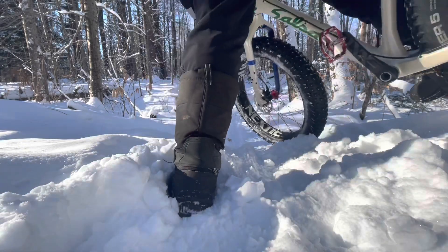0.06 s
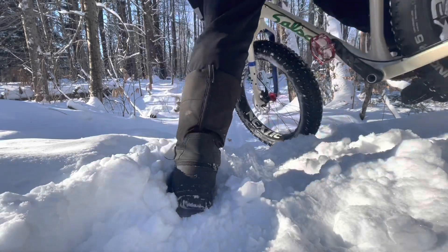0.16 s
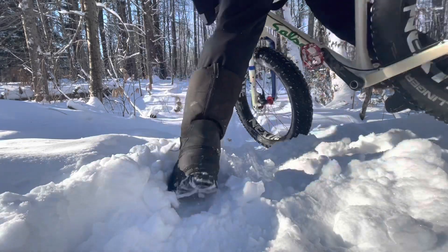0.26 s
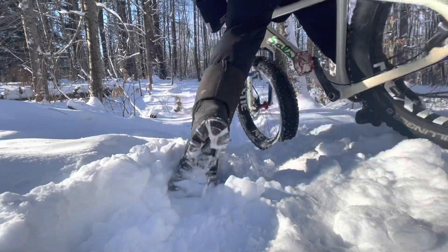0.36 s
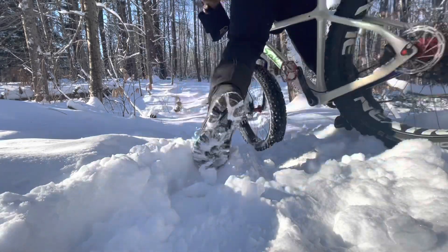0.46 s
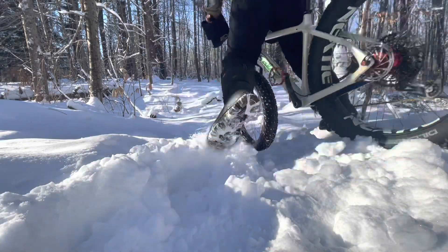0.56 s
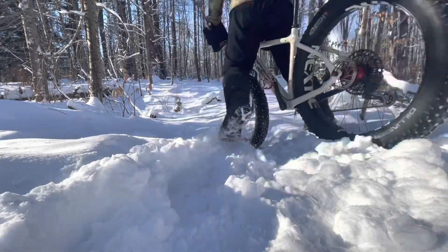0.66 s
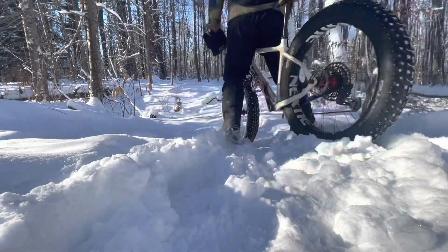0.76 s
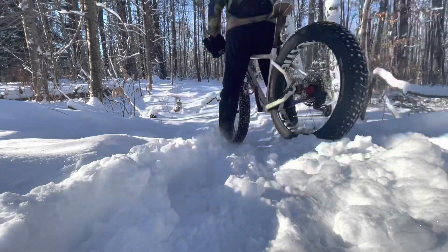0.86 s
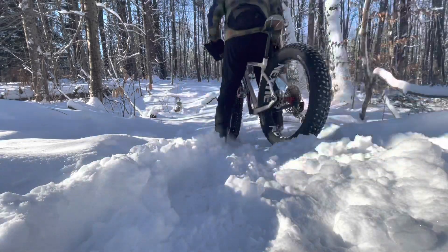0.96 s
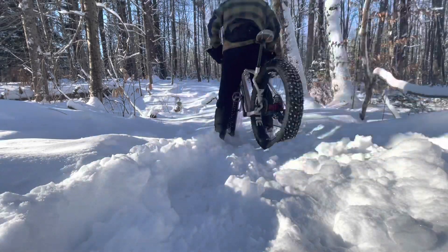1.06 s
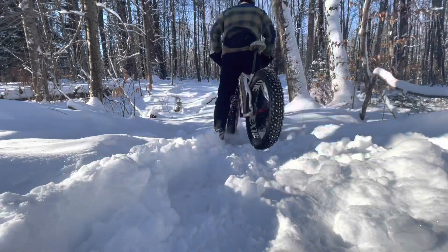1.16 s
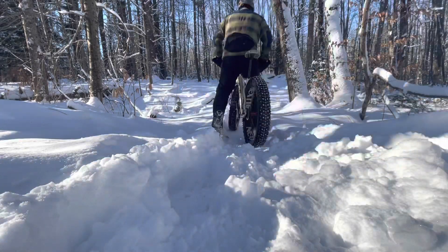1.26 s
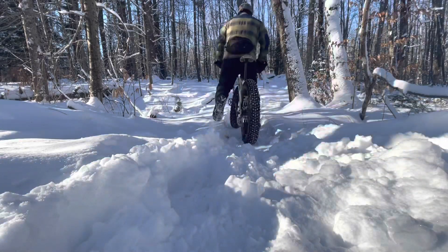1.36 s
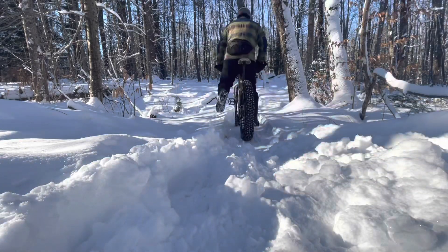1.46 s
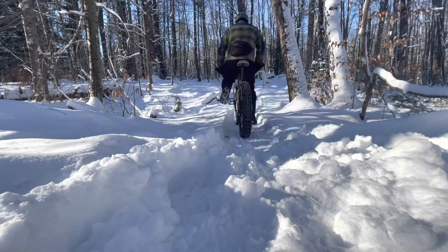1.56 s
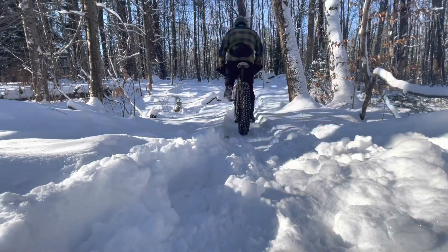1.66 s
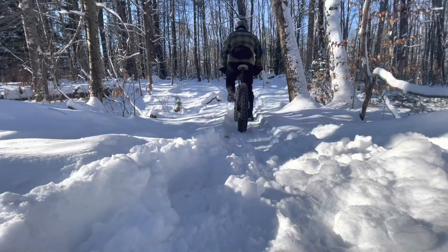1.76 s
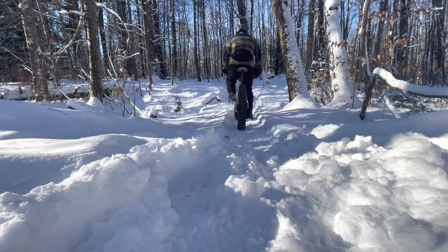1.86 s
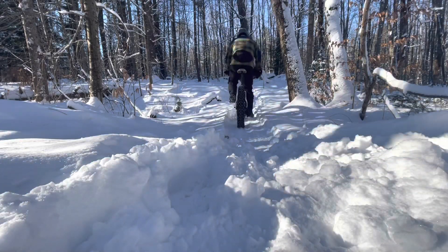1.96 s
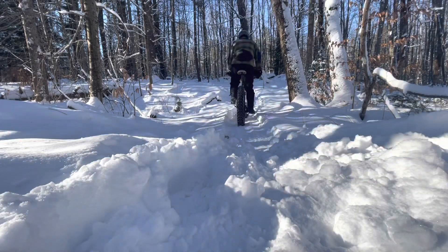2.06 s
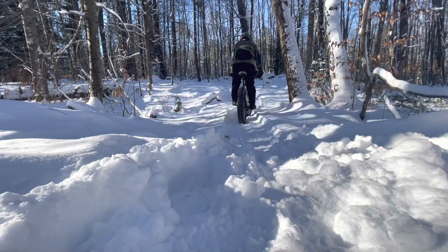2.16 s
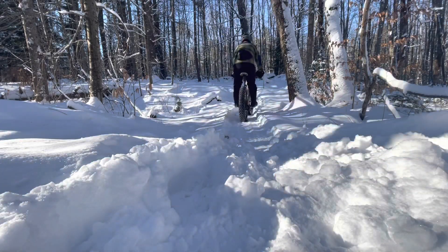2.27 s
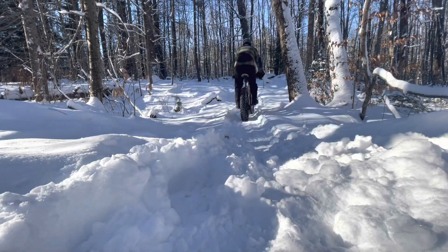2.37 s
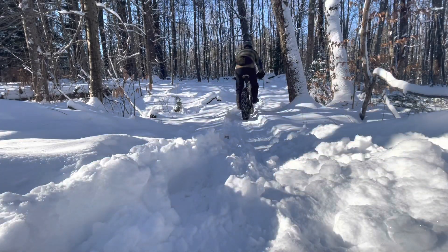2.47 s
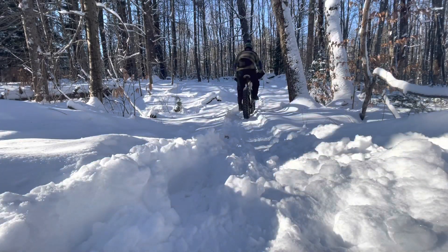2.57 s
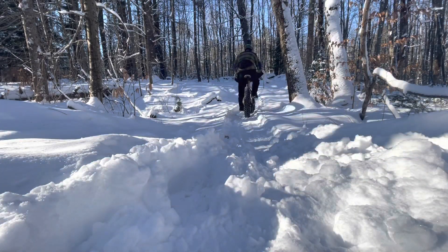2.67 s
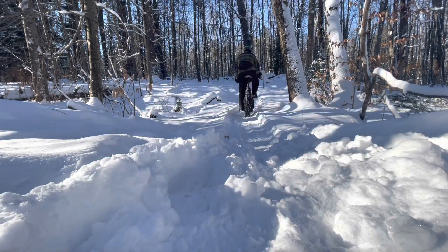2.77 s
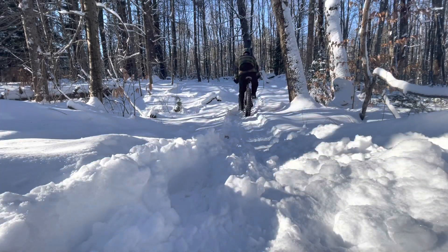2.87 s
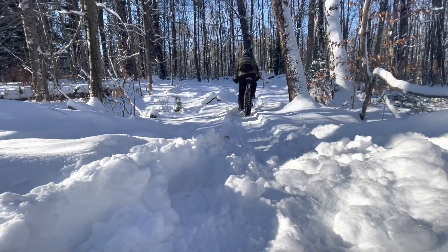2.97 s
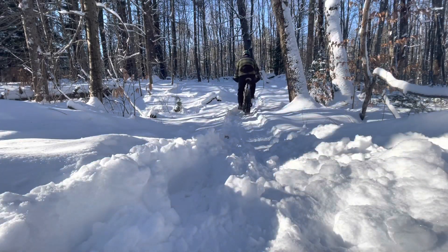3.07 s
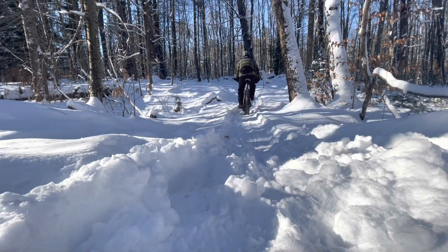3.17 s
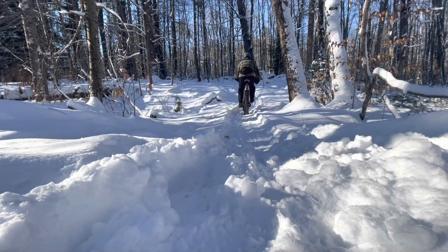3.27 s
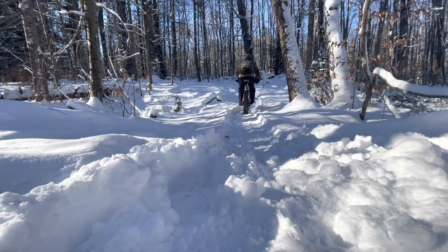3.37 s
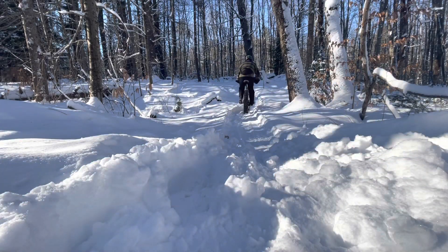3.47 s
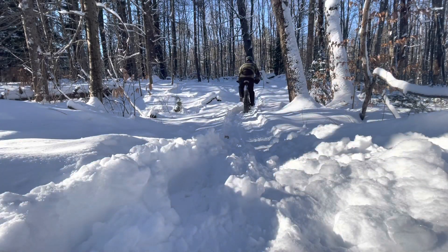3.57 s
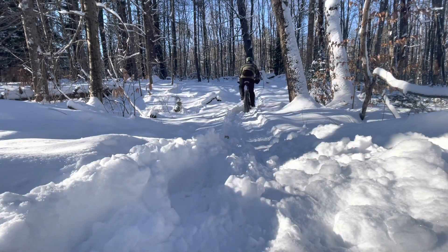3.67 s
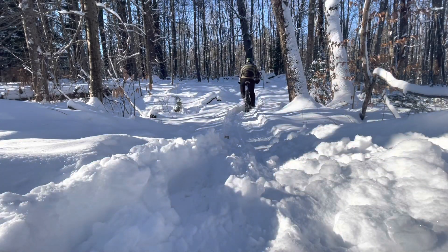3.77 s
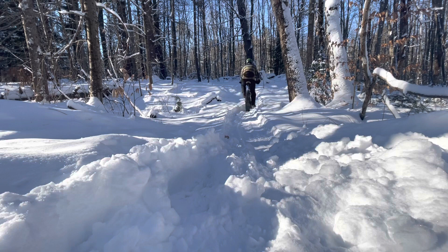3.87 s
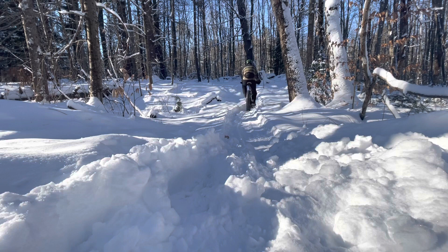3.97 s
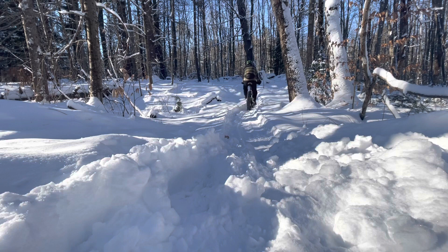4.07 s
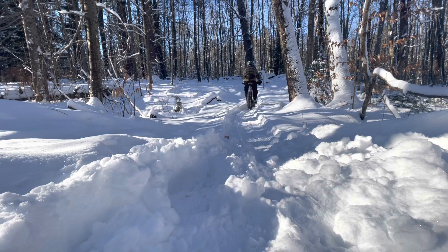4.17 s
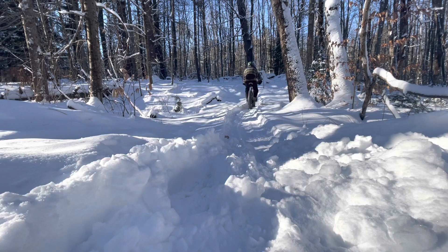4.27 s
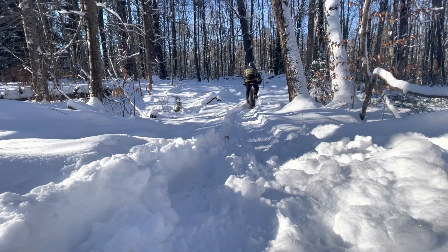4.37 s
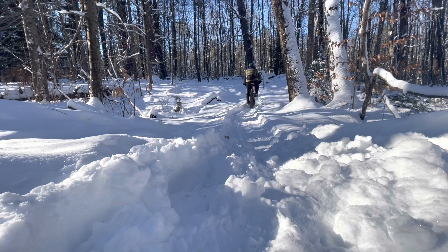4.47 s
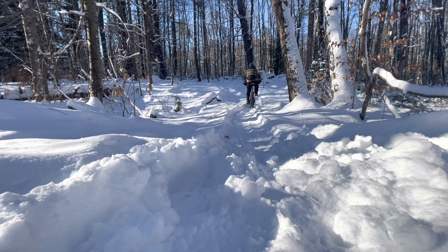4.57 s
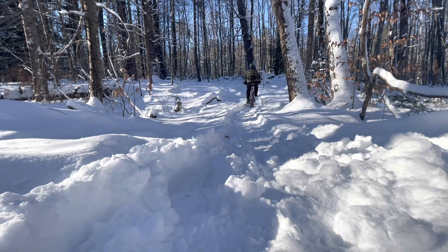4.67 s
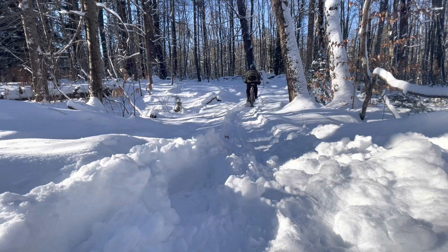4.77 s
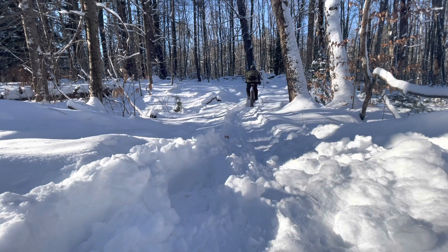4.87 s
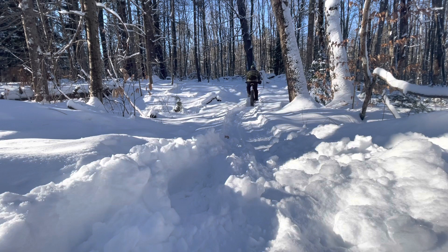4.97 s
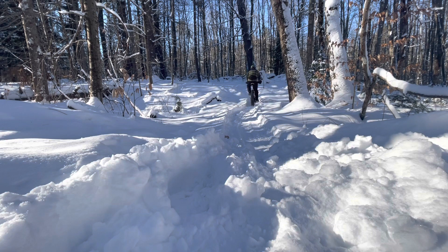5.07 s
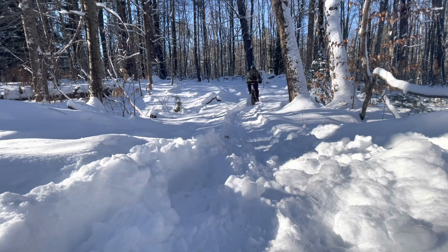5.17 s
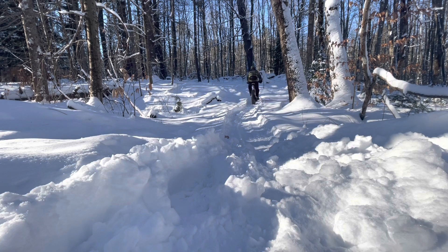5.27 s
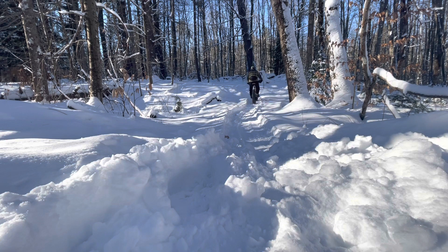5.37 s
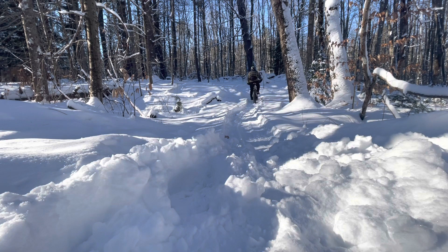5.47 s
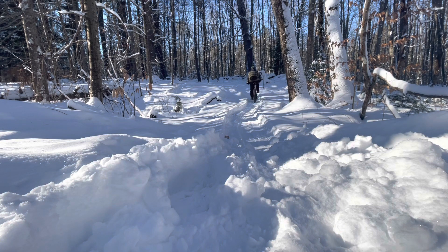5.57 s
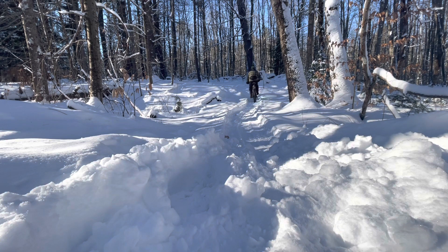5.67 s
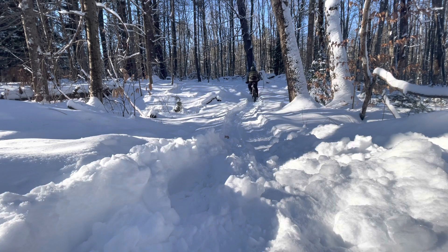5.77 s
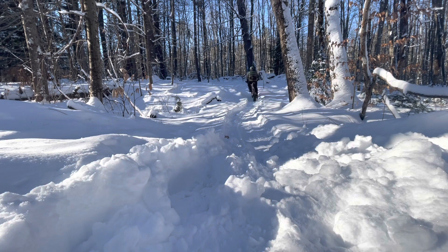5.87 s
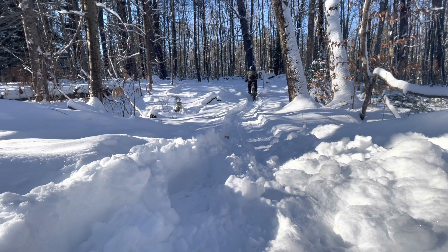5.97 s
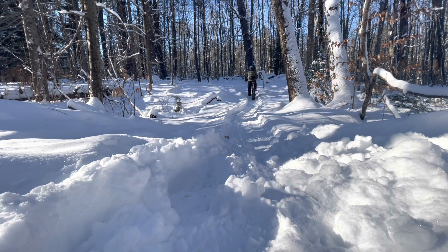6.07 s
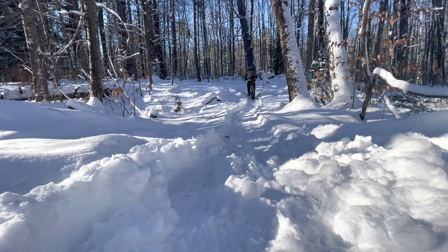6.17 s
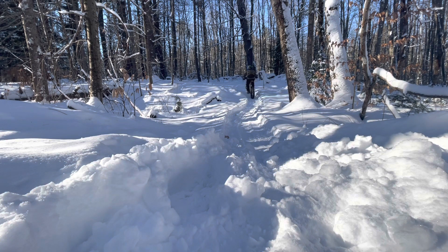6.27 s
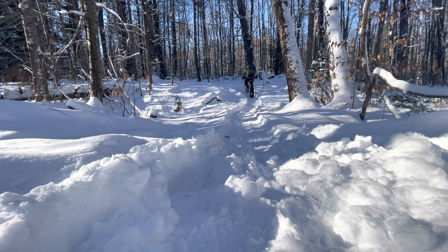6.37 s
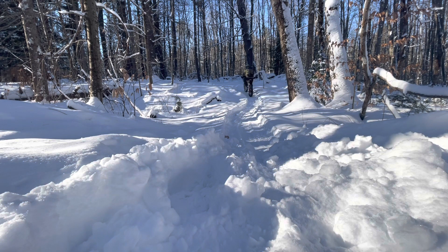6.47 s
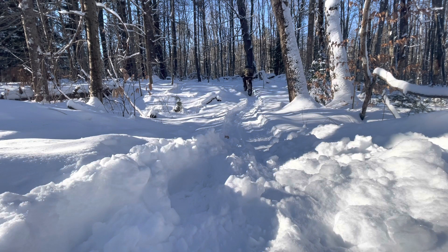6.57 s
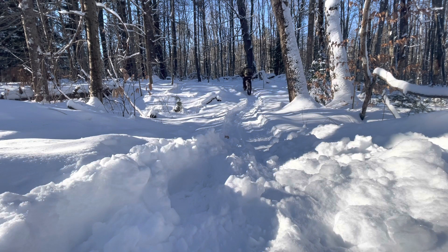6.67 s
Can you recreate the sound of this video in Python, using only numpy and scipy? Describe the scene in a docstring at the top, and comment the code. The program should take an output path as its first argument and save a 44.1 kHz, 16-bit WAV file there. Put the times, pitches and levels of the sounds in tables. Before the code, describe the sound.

In a still, snowy wood, a fat-tyred bicycle starts right at the microphones. From 0 to 0.7 s, boots and tyres collapse the snow in low, falling thuds, with heavy lumpy rumble, short scrapes and soft crunch, wide in stereo. From about 0.27 s the freewheel ticks, crisp and metallic, surging unevenly at some 20 to 60 clicks a second and growing quieter as the bike moves off. Softer thumps come near 1.0 s, and boot scuffs at 1.6 and 1.8 s. Then the clicks run together into a wavering, ratchety buzz, slowing and stopping at 2.9 s. A dull tread hum drums at 3.2-3.55 s. From 3.7 to 5.9 s the distant chain clacks irregularly, strongest around 4.2-4.3, 4.8 and 5.4 s, with bright steel rings and faint trunk echoes. After 6 s, only tiny powder swishes, dull rumble and faint airy hush remain until 6.7 s.

```python
"""Fat-tyred bicycle in deep snow

A bicycle is pushed off right beside the microphones and ridden away into a winter wood. Clicks, one per
ratchet tooth, make its freewheel tick, then buzz while the rider coasts; it stops as he pedals.
Noise bursts through steel resonances make the chain clack. Shaped noise and falling tones make snow rumble
and thump under boots and tyres, wavering tones make the tread hum, and the trunks echo faintly."""
import sys
import numpy as np
from scipy import signal
from scipy.fft import rfft, irfft, next_fast_len
from scipy.io import wavfile
from scipy.ndimage import uniform_filter1d, map_coordinates

SR = 44100
rng = np.random.default_rng(int(sys.argv[2]) if len(sys.argv) > 2 else 0)


def dump(signal):
    """Clip the signal to [-1, 1] and save it as 16-bit WAV at the path in sys.argv[1]."""
    limited = np.clip(np.atleast_2d(signal).T, -1, 1)
    pcm = np.round(limited * 32767).astype(np.int16)
    wavfile.write(sys.argv[1], SR, pcm)


N = 295911  # length in samples

# how far the bicycle has turned its back: start_s, share of the hub heard from behind [0-1]
TURNED_AWAY = [(.8, 0), (1.25, 0.89), (1.75, 0.79)]
# colour of the hub's clicks from behind: pitch_hz, relative level_db
HUB_BEHIND_COLOUR = [(710, -37), (1200, -17), (1700, -12), (2050, -0.5), (3200, -3.5), (4450, -7.5),
                     (5410, -4), (6720, 1.5), (8260, -2.5), (8910, -10), (10000, -20.5), (11400, 0),
                     (12600, -12.5), (13700, -41), (15200, -21), (16000, -10.5)]
# notes at which the hub shell and sprockets ring: pitch_hz, width_hz, relative level_db
HUB_RESONANCES = [(5960, 120, 2.5), (6840, 60, -3), (7869, 27, 0.5), (8640, 87, 4), (8990, 130, 6.5),
                  (10660, 180, -1)]
# the chain catching on the sprockets: start_s, relative clunk level_db, relative ring level_db, clunk pitch_hz
CHAIN_CATCHES = [(2.956, -51.5, -81, 2090), (3.732, -45.5, -44, 2370), (3.804, -45, -44, 1700),
                 (3.874, -57.5, -52, 4410), (3.906, -51, -51, 3620), (3.927, -47.5, -47.5, 1840),
                 (4.122, -57.5, -54, 3800), (4.181, -31.5, -46, 835), (4.284, -36, -29.5, 2080),
                 (4.394, -56, -77, 1400), (4.627, -50.5, -49, 1460), (4.669, -52.5, -43.5, 2100),
                 (4.697, -45, -46.5, 2150), (4.719, -50.5, -50, 1580), (4.779, -25, -33, 1900),
                 (4.955, -36, -35.5, 2340), (5.053, -46.5, -50, 1740), (5.082, -41, -36, 4300),
                 (5.216, -44.5, -47, 3280), (5.309, -41, -43, 1230), (5.415, -25.5, -32.5, 1770),
                 (5.583, -53.5, -54, 1690), (5.793, -56.5, -75, 2310), (5.851, -60, -62, 2900)]
# colour of the duller rumble: pitch_hz, relative level_db
DULL_RUMBLE_COLOUR = [(20, -35), (49, -8.5), (81, -4.5), (128, -6.5), (170, -4), (330, -26.5), (600, -43.5),
                      (780, -53), (1320, -120)]
# colour of crunching snow: pitch_hz, relative level_db
CRUNCH_COLOUR = [(250, -37.5), (450, 5.5), (650, -1), (1000, -3), (1800, -6), (3200, -12.5), (6000, -35)]
# how well the trunks reflect each pitch: pitch_hz, relative level_db
BARK_REFLECTION = [(300, 0), (600, 7.5), (1400, 3.5), (2400, -5.5), (6000, -4), (11000, -9.5)]


def ticking():
    """The pawls drop one tooth at a time as the bicycle is pushed off; the colour shifts as it turns away."""
    # the wheel turns in surges: start_s, speed in ratchet teeth per s
    push_speed = [(0.2678, 41.09), (0.2983, 40.4), (0.3536, 72.99), (0.3914, 17.66), (0.4556, 44.96),
                  (0.5321, 11.73), (0.5562, 29.88), (0.7318, 36.94), (0.7473, 25.58), (0.9138, 49.03),
                  (1.1783, 44.68), (1.1992, 30.83), (1.2838, 58.49), (1.444, 26.12), (1.5817, 40.08),
                  (1.6128, 25.01), (1.6329, 56.44), (1.775, 36.55)]
    # colour of the clicks from nearby: pitch_hz, relative level_db
    near_colour = [(590, -50), (1000, -21), (1590, -12), (2230, -10), (3930, -17), (5130, -9.5), (5970, 1),
                   (7440, -0.5), (8850, 1), (10100, -9.5), (11400, 1), (12100, -5), (13900, -33.5),
                   (15100, -21.5), (16000, -15.5)]
    click_db = -22.5  # burst level at the closest point, before colouring

    s, db = pawls(push_speed)
    clicks = bursts(s - .0005, db + click_db, rise=0.0019, decay=0.0032, tail_db=-17.5, tail=0.013, spread_db=1.5)
    varied = shimmer(clicks, depth_db=3.0, size=256)
    turned = np.clip(curves(TURNED_AWAY)[0], 0, 1)
    facing = np.sqrt(1 - turned) * varied
    near = coloured(facing, near_colour)
    # swapping the two noises keeps the view from behind unrelated to the near one
    behind = coloured(np.sqrt(turned) * varied[::-1], HUB_BEHIND_COLOUR)
    shell = amp(2.5) * ringing(facing, HUB_RESONANCES)
    return steered(near + behind + shell, shell_and_treble)


def coasting():
    """The clicks run together into a buzz that follows the wheel; its colour keeps shifting."""
    # the freewheel slips faster and slower: start_s, speed in ratchet teeth per s
    coast_speed = [(1.771, 38.21), (1.8242, 101.45), (1.8942, 48.5), (2.0801, 110.48), (2.1851, 85.35),
                   (2.1855, 92.79), (2.3988, 59.19), (2.5217, 71.6), (2.5434, 66.76), (2.677, 82.08),
                   (2.785, 64.97), (2.9, 13.74)]
    click_db = -23  # burst level at the closest point, before colouring

    s, db = pawls(coast_speed)
    clicks = bursts(s[1:], db[1:] + click_db, rise=0.0019, decay=0.0032, tail_db=-14, tail=0.019, spread_db=-1.0)
    varied = shimmer(clicks, depth_db=2.0, size=256)
    buzz = steered(coloured(varied, HUB_BEHIND_COLOUR), hollow)
    return buzz + ringing(clicks, HUB_RESONANCES)


def pawls(speed):
    """Time and level (dB) of each tooth passed: quieter with distance and behind the tyre."""
    pass_s, closest_m, speed_m_per_s = 0.24, 0.85, 1.74  # the hub passes the microphones and moves off
    shadow_db = 6  # the rear tyre screens a hub heard fully from behind
    scatter_db = 0.6  # no two teeth drop equally hard

    start, end = speed[0][0], speed[-1][0]
    t = np.arange(round(start * SR), round(end * SR)) / SR
    rate = np.interp(t, *np.transpose(speed))
    teeth = np.cumsum(rate) / SR
    # a click falls wherever the running count reaches a whole tooth
    at = np.searchsorted(teeth, np.arange(teeth[-1]))
    distance = np.hypot(closest_m, speed_m_per_s * (t[at] - pass_s))
    screened_db = shadow_db * np.interp(t[at], *np.transpose(TURNED_AWAY))
    db = 20 * np.log10(closest_m / distance) - screened_db
    return t[at], db + scatter_db * rng.standard_normal(len(at))


def shell_and_treble(t, hz):
    """The shell ring and the treble of the ticking rise and fall over time, given as a gain in dB."""
    # colour of the ticking over time: start_s, shell ring boost_db, treble boost_db
    colour_changes = [(.27, 2, -6), (.335, 3.5, -4), (0.431, 3, -7), (.57, 1, -2), (.75, 0, -1.5),
                      (.95, -3, 2.5), (1.2, 11, 6), (1.45, -10, -0.5), (1.75, 3, -2)]
    shell_hz, shell_octaves, treble_hz = 5975, 0.065, 7600  # the shell's ring, its width; start of the treble

    s, shell_db, treble_db = np.transpose(colour_changes)
    shell = np.interp(t, s, shell_db) * bell(hz, shell_hz, shell_octaves)
    treble = 1 / (1 + (treble_hz / hz) ** 10)
    return shell + np.interp(t, s, treble_db) * treble


def hollow(t, hz):
    """A band that drifts in pitch is raised or lowered in the coasting buzz, giving its gain in dB."""
    # the drifting band: start_s, pitch_hz, boost_db
    hollow_band = [(1.78, 2380, -4), (1.92, 2050, 7), (2.05, 2130, 3), (2.152, 2370, 2), (2.262, 2560, -1),
                   (2.45, 2344, -0.5), (2.7, 2130, -1), (2.898, 2400, 0.5)]
    s, centre, db = np.transpose(hollow_band)
    return np.interp(t, s, db) * bell(hz, np.interp(t, s, centre), octaves=0.25)


def gears():
    """The chain drops onto a sprocket: a clunk at that sprocket's pitch and a bright ring of steel."""
    # colour of the clunk: pitch_hz, relative level_db
    clunk_colour = [(150, -26), (330, -36), (530, -9.5), (850, -9), (1300, -3), (1750, 0), (2500, -2.5),
                    (3100, -3.5), (3800, -0.5), (4700, -11.5), (7000, -17), (10000, -48.5)]
    # colour of the ring: pitch_hz, relative level_db
    ring_colour = [(2650, -5), (4500, -4.5), (6870, 2), (8070, -3), (9160, 1.5), (10100, -11), (11500, 1.5),
                   (13100, -50), (14000, -44.5), (15000, -27.5)]
    # notes of the frame and chainrings under a clunk: pitch_hz, width_hz, relative level_db
    frame_resonances = [(830, 49, 5.5), (1050, 39, -4.5), (1330, 70, 0.5), (1490, 47, -7), (1785, 70, -3.5),
                        (2030, 80, -3), (2290, 90, -2), (3270, 110, -4), (3700, 90, 2.5)]

    s, clunk_db, ring_db, hz = np.transpose(CHAIN_CATCHES)
    knock = bursts(s - .0012, clunk_db, rise=0.0061, decay=0.0029, tail_db=-26.0, tail=0.012, spread_db=0.5)
    body = amp(-0.5) * coloured(knock, clunk_colour) + amp(4) * ringing(knock, frame_resonances)
    clunk = pitched(body, s, hz, boost_db=9.0, width=0.24)
    strike = bursts(s - .001, ring_db, rise=0.0027, decay=0.0026, tail_db=-28.0, tail=0.056, spread_db=3.0)
    ring = coloured(shimmer(strike, depth_db=6.0), ring_colour)
    return clunk + ring + amp(-12.0) * ringing(strike, HUB_RESONANCES)


def steel():
    """Now and then a sprocket or brake disc sings on in one thin, slightly unsteady tone."""
    # steel left ringing after a hard contact: start_s, pitch_hz, relative level_db, time to fall 60 dB_s
    steel_rings = [(.365, 9350, -26, 0.036), (4.285, 9080, -51.5, 0.44), (4.834, 6370, -62, 0.41)]
    track, t = np.zeros(N), np.arange(SR // 2) / SR
    for s, hz, db, t60 in steel_rings:
        phase = 2 * np.pi * hz * t + .9 * wobble(120)[:len(t)]
        fall = amp(db + 5.5 - 60 * t / t60)
        add(track, s, fall * (1 - np.exp(-t / 0.0011)) * np.sin(phase))
    return np.array([track, np.zeros(N)])


def jolts():
    """The frame and tyres shudder briefly after each clunk of the chain: a short, dull noise."""
    s, clunk_db, _, _ = np.transpose(CHAIN_CATCHES)
    # the shudder starts 18.5 dB below the clunk's listed level
    shudder = bursts(s, clunk_db - 18.5, rise=0.0014, decay=0.037, tail_db=-16, tail=0.03, spread_db=7.0)
    return coloured(shudder, DULL_RUMBLE_COLOUR)


def snow_and_hiss():
    """Tyres pack the snow in a lumpy rumble and grainy crunch; a fine hiss lies between and after the clicks."""
    # snow packed under the tyres: start_s, rumble level_db, crunch level_db (both then waver)
    packing = [(0, -29.5, -44), (.13, -41.5, -63), (.225, -34.5, -49), (.26, -23.5, -48.5),
               (.34, -30.5, -46), (.47, -32.5, -51), (.64, -32.5, -49.5), (.77, -40.5, -49.5),
               (1.18, -43, -52), (1.48, -46.5, -62), (1.68, -46, -52), (1.98, -49.5, -65),
               (2.4, -52, -62.5), (2.58, -46.5, -63), (2.9, -46, -62), (3.15, -51.5, -67.5),
               (3.5, -50, -65), (4.05, -54.5, -63), (5.45, -55, -68.5), (5.75, -58, -77), (5.97, -62, -97),
               (6.71, -57.5, -75.5)]
    # fine hiss between and after the freewheel clicks, fading when they stop: start_s, level_db
    hiss_level = [(0, -61.5), (.35, -57.5), (.6, -58.5), (2.75, -60), (3, -76), (3.6, -83), (5.3, -73.5),
                  (6, -84.5)]
    # dulling by distance: start_s, share of the rumble that is dulled [0-1]
    dulling = [(3.6, 0.0081), (5.4, 0.95)]
    # colour of the near rumble: pitch_hz, relative level_db
    near_rumble_colour = [(20, -37), (48, -7), (101, -2), (135, -1), (200, -2), (290, 0), (700, -23),
                          (910, -51.5), (1540, -120)]
    # colour of the fine hiss: pitch_hz, relative level_db
    hiss_colour = [(1200, -31.5), (2400, 0.5), (4000, 1.5), (6500, 3), (9300, 3.5), (10200, -12),
                   (12000, -20), (14000, -32.5)]

    rumble_db, crunch_db = curves(packing)
    far = np.clip(curves(dulling)[0], 0, 1)
    near_rumble = np.sqrt(1 - far) * coloured(grit(2.7), near_rumble_colour)
    far_rumble = np.sqrt(far) * coloured(grit(2.0), DULL_RUMBLE_COLOUR)
    rumble = (near_rumble + far_rumble) * amp(rumble_db + 1.7 * wobble(35))
    crunch = amp(crunch_db + 2.14 * wobble(60)) * coloured(grit(1.7), CRUNCH_COLOUR)
    hiss = amp(curves(hiss_level)[0]) * coloured(grit(1.7), hiss_colour)
    return rumble + crunch + hiss


def thumps():
    """Each collapse of the snow is a low thud whose pitch drops as the pack settles; one such thud also follows
    a hard clunk of the chain."""
    # low thuds, mostly snow giving way under a boot or tyre, one (4.288 s) the frame after a hard chain clunk:
    # start_s, relative level_db, first pitch_hz, last pitch_hz, decay_s
    thuds = [(.002, -18, 386, 187.7, 0.0087), (.157, -24.5, 616, 364, 0.0021),
             (0.196, -23, 634, 72.1, 0.03), (.232, -24, 641, 137, 0.034),
             (.249, -25.5, 300.5, 190, 0.019), (.262, -23.5, 260, 169, 0.017),
             (0.289, -24.5, 584, 246.3, 0.008), (.293, -19.5, 140, 66, .028),
             (0.507, -23.5, 179, 89.4, 0.0094), (0.531, -21, 420, 100, 0.018),
             (0.575, -28.5, 197.7, 70.8, 0.013), (.698, -25.5, 263.4, 70, 0.016),
             (1.014, -22.5, 312.3, 174.2, 0.0067), (1.056, -26, 150, 98.2, 0.011),
             (1.125, -29, 216, 95, 0.011), (1.161, -30, 146, 102.3, 0.015),
             (1.592, -32.5, 326.5, 239.5, 0.012), (1.801, -23, 259.7, 103.5, 0.0127),
             (4.288, -44, 270, 130, 0.032), (5.086, -36.5, 248, 154, 0.012),
             (6.261, -47, 172.6, 133, 0.026)]
    track, t = np.zeros(N), np.arange(SR // 5) / SR
    for s, db, first_hz, last_hz, decay in thuds:
        hz = last_hz + (first_hz - last_hz) * np.exp(-t / 0.0068)
        tone = np.sin(2 * np.pi * np.cumsum(hz) / SR)
        swell_and_fall = (1 - np.exp(-t / 0.00076)) * np.exp(-t / decay)
        add(track, s, amp(db + 2.0) * tone * swell_and_fall)
    return np.array([track, np.zeros(N)])


def tread():
    """Rubber knobs drum and rub on firmer snow: a low, uneven hum that bends in pitch."""
    # one table per stretch of firmer snow: start_s, pitch_hz (then wavers), relative level_db
    stretches = [
        [(0, 401, -30), (.05, 378, -33.5), (.125, 395, -38)],
        [(.1, 159.5, -40), (.16, 149.2, -30), (.205, 162, -41)],
        [(1.52, 171.4, -37), (1.57, 155, -41), (1.615, 116.6, -33.5), (1.69, 108, -53)],
        [(3.22, 126.3, -43), (3.295, 152.4, -40), (3.345, 109, -35), (3.38, 91.3, -34), (3.42, 123, -35),
         (3.46, 144.8, -35.5), (3.5, 199, -47), (3.55, 138.5, -40)],
        [(4.41, 132.4, -47), (4.48, 153.4, -47), (4.54, 162, -57)],
        [(5.56, 118, -55), (5.62, 118.2, -43.5), (5.7, 140.9, -47.5), (5.81, 188.5, -54)],
    ]
    hum, t = np.zeros(N), np.arange(N) / SR
    for stretch in stretches:
        hz, db = curves(stretch)
        fade = np.clip(np.minimum(t - stretch[0][0], stretch[-1][0] - t) / 0.018, 0, 1)
        phase = 2 * np.pi * np.cumsum(hz * (1 + 0.064 * wobble(90))) / SR
        level = amp(db - 1.5 + 2.7 * wobble(45))
        hum += fade * level * (np.sin(phase) + amp(-35.0) * np.sin(2 * phase))
    return np.array([hum, np.zeros(N)])


def scuffs():
    """Boots scrape and crumble the crust: short bursts of noise with the colour of crunching snow."""
    # boots scuffing the snow: start_s, relative level_db
    scrapes = [(0.156, -30), (0.197, -29.5), (.233, -40), (.258, -33), (.29, -27.5), (1.586, -22.5),
               (1.779, -19), (1.794, -23)]
    s, db = np.transpose(scrapes)
    scrape = bursts(s, db - 20.5, rise=0.0046, decay=0.014, tail_db=-19.5, tail=0.05, spread_db=2.5)
    return coloured(scrape, CRUNCH_COLOUR)


def swishes():
    """Far off, the tyres plough through loose powder: soft swells of fine grains."""
    # each swell: middle_s, peak level_db, half length_s
    swells = [(5.72, -76.5, 0.17), (6.185, -74, 0.063), (6.376, -69, 0.055), (6.486, -71, 0.033)]
    t = np.arange(N) / SR
    power = sum(amp(db) ** 2 * np.exp(-((t - s) / half) ** 2) for s, db, half in swells)
    grains = filtered(grit(3.4), lambda hz: bell(hz + 1, centre=2595, octaves=1.2))
    return np.sqrt(power) * unit(grains)


def near_trunks(x, first_s, last_s, fall_db, count=14):
    """The nearest trunks each throw back a separate slap, from a side of their own; later ones are weaker."""
    taps = np.zeros((2, SR // 2))
    for late, left_right in rng.random((count, 2)):
        at = int(min(first_s + (last_s - first_s) * late, .45) * SR)
        taps[:, at] += amp(-fall_db * late) * np.array([1, 2 * left_right - 1])
    slaps = signal.fftconvolve(x[:1], taps / np.linalg.norm(taps[0]), axes=1)[:, :N]
    return filtered(slaps, lambda hz: amp(along(BARK_REFLECTION, hz)))


def trunks(x, build):
    """Echoes scattered by countless trees: each band's energy builds up and dies away as diffuse noise."""
    # how long the wood echoes: pitch_hz, time to fall 60 dB_s (ahead of the build-up)
    wood_echo = [(200, 0.7), (5000, 0.49), (12000, 0.33)]
    hz, _, z = signal.stft(x[0], SR, nperseg=256)
    t = np.arange(SR // 128) * 128 / SR
    decay = amp(-60 * t / along(wood_echo, hz)[:, None]) ** 2 * (1 - np.exp(-(t / build) ** 2))
    energy = uniform_filter1d(abs(z) ** 2, size=3, axis=0)
    power = signal.fftconvolve(energy, decay / decay.sum(1, keepdims=True), axes=1)
    noise = signal.stft(rng.standard_normal((2, N)), nperseg=256)[2]
    scattered = np.sqrt(abs(power[:, :z.shape[1]])) * amp(along(BARK_REFLECTION, hz))[:, None]
    return signal.istft(scattered * noise / noise.std(), nperseg=256)[1][:, :N]


def air():
    """A very faint, slowly swelling hush among the trees, louder on the left."""
    # colour of the still wood: pitch_hz, relative level_db
    air_colour = [(650, 0.5), (1300, 2), (2300, 1.5), (3500, -4), (5200, -18), (9000, -19), (15000, -57.5)]
    hush = coloured(rng.standard_normal((2, N)), air_colour) * amp(-72 + 2.4 * wobble(4))
    left_extra_db = 6.5  # left minus right
    return hush * amp(left_extra_db * np.array([[.5], [-.5]]))


def bursts(times, levels_db, rise, decay, tail_db, tail, spread_db):
    """A short burst of gritty noise at each time: a quick swell, a fast fall and a weaker tail (times in s)."""
    t = np.arange(SR // 6) / SR
    shape = (1 - np.exp(-(t / rise) ** 2)) * (np.exp(-t / decay) + amp(tail_db) * np.exp(-t / tail))
    shape /= shape.max()
    power = np.zeros(N)
    for s, db in zip(times, levels_db):
        add(power, s, (amp(db) * shape) ** 2)
    return np.sqrt(power) * grit(spread_db)


def grit(spread_db):
    """Two unrelated noises of joint rms 1, clumped into grains under a millisecond long."""
    return unit(rng.standard_normal((2, N)) * amp(spread_db * wobble(1500)))


def shimmer(x, depth_db, size=512):
    """The colour flickers at random, as when a turning wheel makes each contact land elsewhere."""
    z = signal.stft(x, nperseg=size)[2]
    field = rng.standard_normal(z.shape[1:])
    field = uniform_filter1d(uniform_filter1d(field, size=3, axis=0), size=7, axis=1)
    gain = amp(depth_db * unit(field))
    # even out the gain across neighbouring pitches: the colour changes more than the loudness
    gain /= np.sqrt(uniform_filter1d(gain ** 2, size=25, axis=0))
    return signal.istft(z * gain, nperseg=size)[1][:, :N]


def pitched(x, times, centres_hz, boost_db, width):
    """From each time on, a broad resonance (width in octaves) stands at that contact's pitch."""
    hz, t, z = signal.stft(x, SR, nperseg=256)
    latest = np.maximum(np.searchsorted(times - .008, t) - 1, 0)  # moves 8 ms ahead of the contact
    gain_db = boost_db * (bell(hz[:, None] + 1, centres_hz[latest], width) - .5)
    return signal.istft(z * amp(gain_db), nperseg=256)[1][:, :N]


def ringing(x, modes):
    """x through narrow resonances given as (pitch_hz, width_hz, level_db)."""
    def response(f):
        return sum(amp(db) * 1j * f * w / (c * c - f * f + 1j * f * w) for c, w, db in modes)
    return filtered(x, response)


def steered(x, gain_db):
    """x through a colour that moves: gain_db(s, Hz)."""
    hz, t, z = signal.stft(x, SR, nperseg=512)
    return signal.istft(z * amp(gain_db(t, hz[:, None] + 1)), nperseg=512)[1][:, :N]


def coloured(x, spectrum, size=4096):
    """Colour x without sounding ahead of it (minimum phase), keeping the power of white noise."""
    cepstrum = irfft(np.log(np.maximum(amp(along(spectrum, np.fft.rfftfreq(size, 1 / SR))), 1e-6)))
    # folding the cepstrum forward makes the filter causal
    cepstrum[1:size // 2] *= 2
    cepstrum[size // 2 + 1:] = 0
    kernel = irfft(np.exp(rfft(cepstrum)))
    return signal.fftconvolve(x, kernel[None] / np.linalg.norm(kernel), axes=1)[:, :N]


def filtered(x, response):
    """x times a complex response of frequency."""
    m = next_fast_len(N + SR // 2)
    return irfft(rfft(x, m) * response(np.fft.rfftfreq(m, 1 / SR)), m)[..., :N]


def bell(hz, centre, octaves):
    """A bump of height 1 around a centre frequency."""
    return np.exp(-(np.log2(hz / centre) / octaves) ** 2)


def along(points, hz):
    """Read (Hz, value) points on a log axis."""
    f, v = np.transpose(points)
    return np.interp(np.log(hz + 1), np.log(f + 1), v)


def curves(rows):
    """One value per sample for each column after the time."""
    s, *cols = np.transpose(rows)
    return [np.interp(np.arange(N) / SR, s, c) for c in cols]


def wobble(rate):
    """A smooth random curve with rate knots a second."""
    return map_coordinates(rng.standard_normal(int(N * rate / SR) + 4), [np.arange(N) * rate / SR])


def amp(db):
    """Decibels to gain."""
    return 10 ** (np.asarray(db) / 20)


def unit(x):
    """Scale to rms 1."""
    return x / np.sqrt(np.mean(x ** 2) + 1e-20)


def add(track, s, sound):
    """Mix a sound into a track at time s."""
    part = track[max(round(s * SR), 0):][:len(sound)]
    part += sound[:len(part)]


def ports(pair, direct, width_db, ahead=0):
    """Left and right are mid plus and minus side; the side is part pressure gradient, part diffuse sound."""
    # phase of the side against the mid for direct sound: pitch_hz, phase_radians
    side_phase = [(120, -0.5), (300, -1.64), (600, -2), (1300, -1.5), (2500, -1.4), (4200, 1.4),
                  (6300, 0.8), (8500, -2.5), (11000, -1.6)]
    # side against mid, before width_db is added: pitch_hz, level_db
    stereo_width = [(60, -21.5), (250, -16.5), (550, -9.5), (1100, -8.5), (2300, -14.5), (4300, -10.5),
                    (7500, -6), (9100, -4), (10100, 21), (11100, -3.5), (12500, -9.5), (15000, -0.5)]
    # sound close beside the microphones is wider: start_s, strength of the extra side (a plain factor)
    beside = [(0, 2.5), (.4, 2.5), (.9, 0.7), (1.1, 0)]
    # colour of that extra side: pitch_hz, relative level_db
    beside_spread = [(50, 0.5), (300, 12.5), (800, 16), (2500, 16), (4500, 12.5), (7000, -6.5),
                     (10000, -24.5)]
    # side of a source straight ahead: pitch_hz, level_db added
    ahead_side = [(900, -4.5), (2200, -26), (3100, 2), (4100, -16.5), (5200, 5.5), (7300, -10.5),
                  (9000, 1.5)]

    direct = np.clip(direct, 0, 1)
    gradient = filtered(pair[0], lambda hz: np.exp(1j * along(side_phase, hz)))
    side = direct * gradient + np.sqrt(1 - direct ** 2) * pair[1]
    side = filtered(side, lambda hz: amp(along(stereo_width, hz) + width_db))
    extra = filtered(side, lambda hz: amp(along(beside_spread, hz) - 13.5))
    side = side + curves(beside)[0] * extra
    side = (1 - ahead) * side + ahead * filtered(side, lambda hz: amp(along(ahead_side, hz)))
    return np.array([pair[0] + side, pair[0] - side])


def scene():
    """Mix freewheel, chain and ground with the wood's echo of freewheel and chain, and the hush of the air."""
    tick, buzz, chain = ticking(), coasting(), gears()
    echo = trunks(amp(-20.0) * tick + amp(-14.5) * buzz + amp(-12.5) * chain, build=0.0027)
    echo += amp(-23) * near_trunks(chain, first_s=0.017, last_s=.15, fall_db=35)
    turned = np.clip(curves(TURNED_AWAY)[0], 0, 1)
    hub = ports(tick + buzz, direct=.7, width_db=2.2, ahead=turned)
    drive = ports(chain + steel(), direct=.8, width_db=1.5)
    low_layers = snow_and_hiss() + swishes() + thumps() + tread() + scuffs() + jolts()
    ground = ports(low_layers, direct=0.4, width_db=2.5)
    return hub + drive + ground + ports(echo, direct=.2, width_db=13.5) + air()


def record(dry):
    """The two microphones differ a little in colour and shut out the deepest rumble and highest treble."""
    # left minus right: pitch_hz, level_db
    lean = [(60, 0.97), (900, -0.52), (2200, -1.4), (4400, .6), (7500, 0.18)]
    low_cut_hz, top_hz = 39, 15900

    def response(hz):
        low_cut = 1 / np.sqrt(1 + (low_cut_hz / (hz + 1)) ** 10)
        return amp(along(lean, hz) * np.array([[.5], [-.5]])) * low_cut * (hz < top_hz)
    return filtered(dry, response)


dry = scene()
out = record(dry)
dump(out)
```